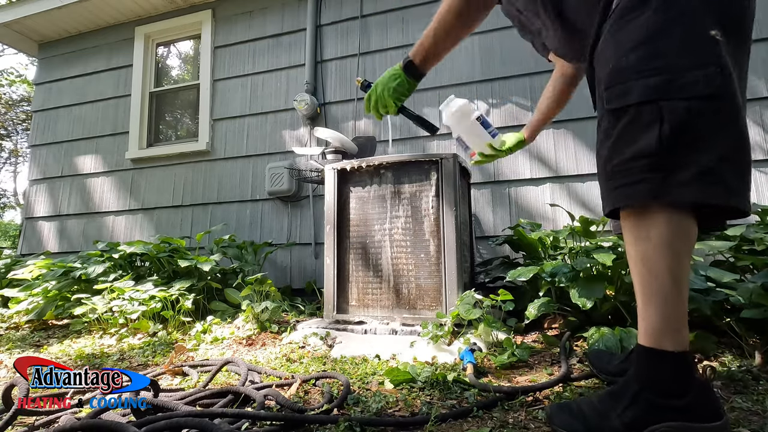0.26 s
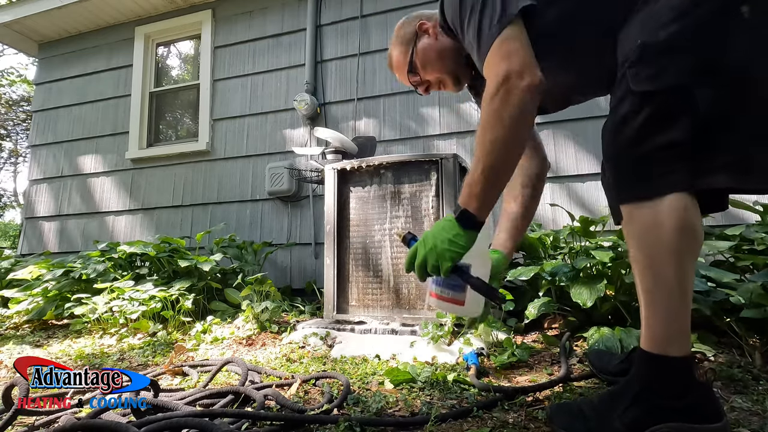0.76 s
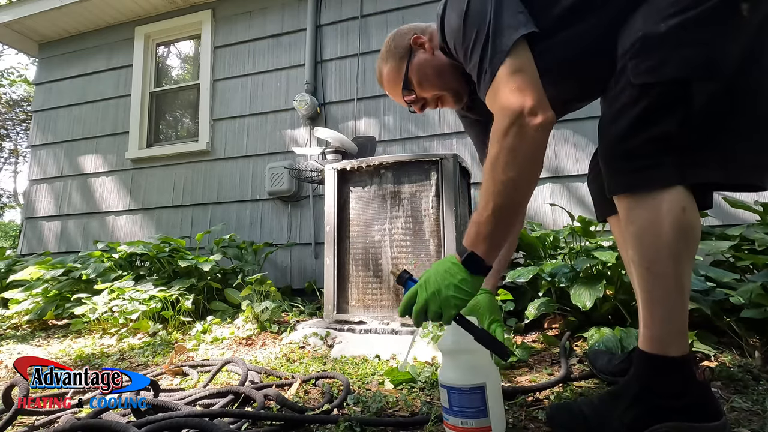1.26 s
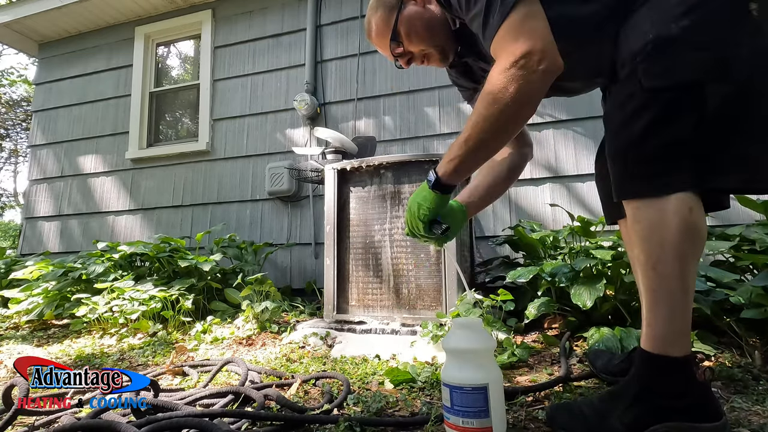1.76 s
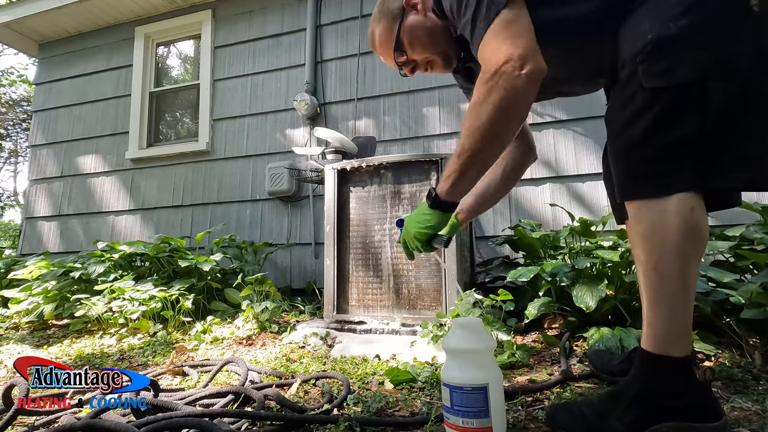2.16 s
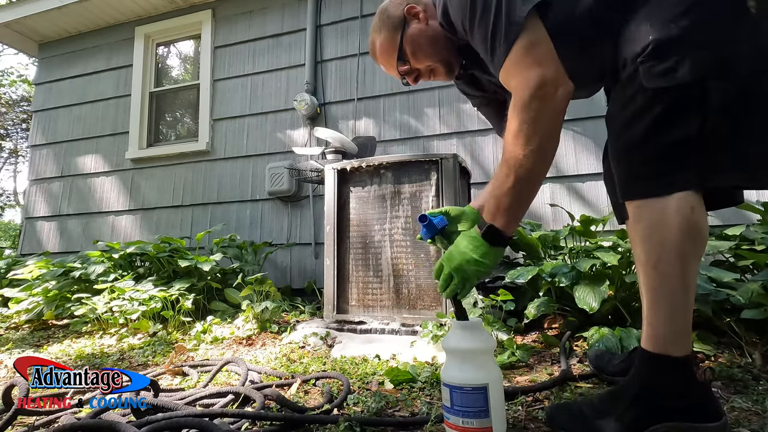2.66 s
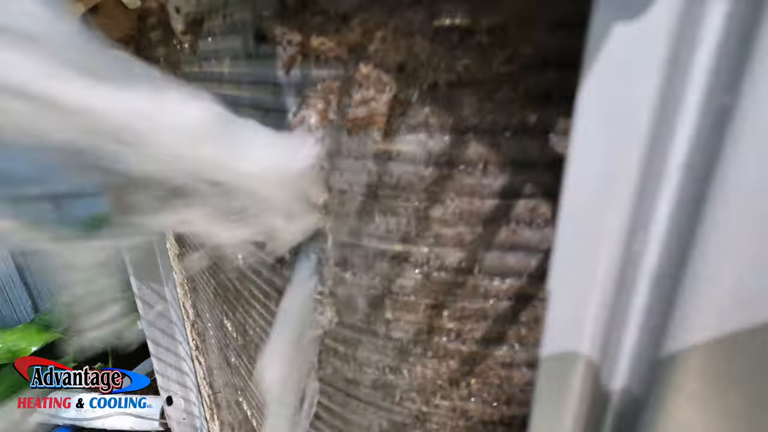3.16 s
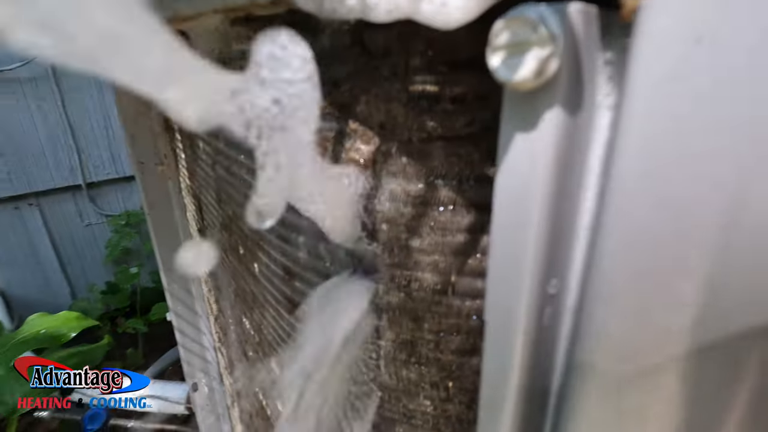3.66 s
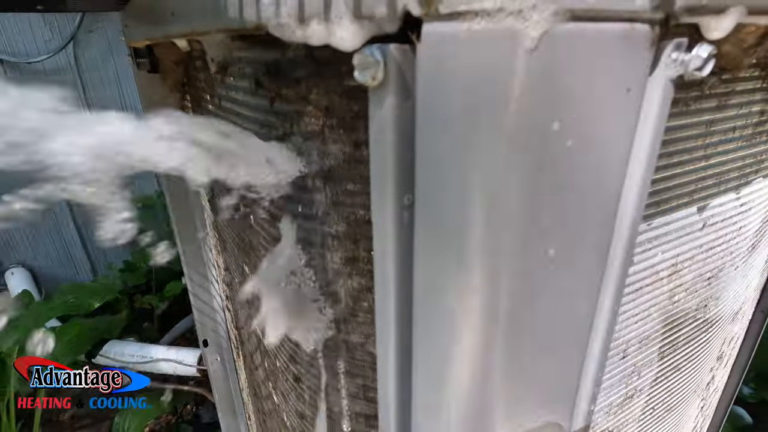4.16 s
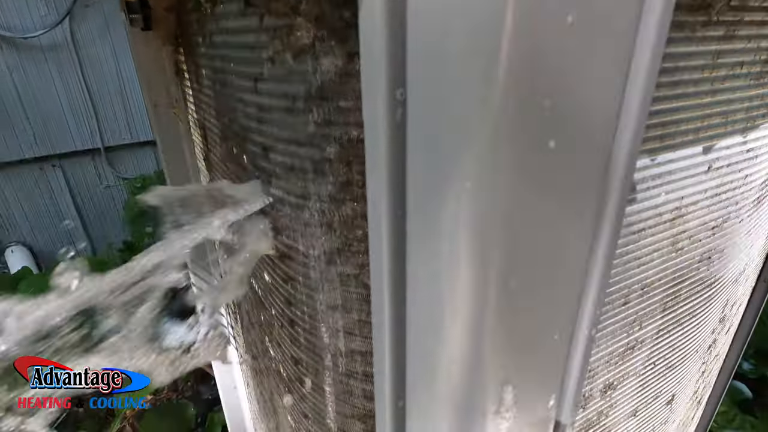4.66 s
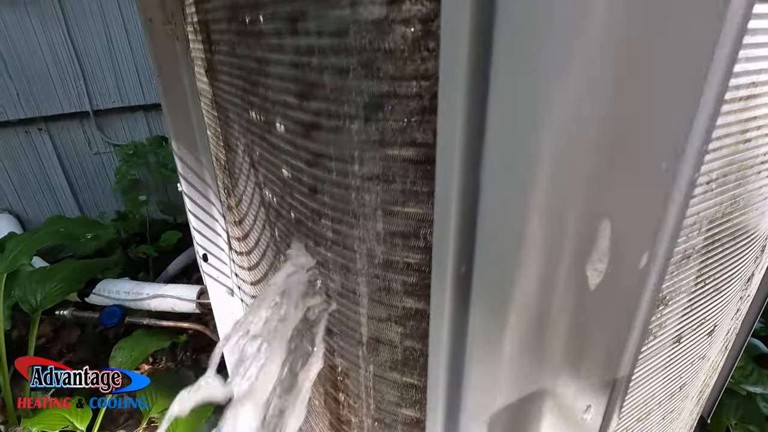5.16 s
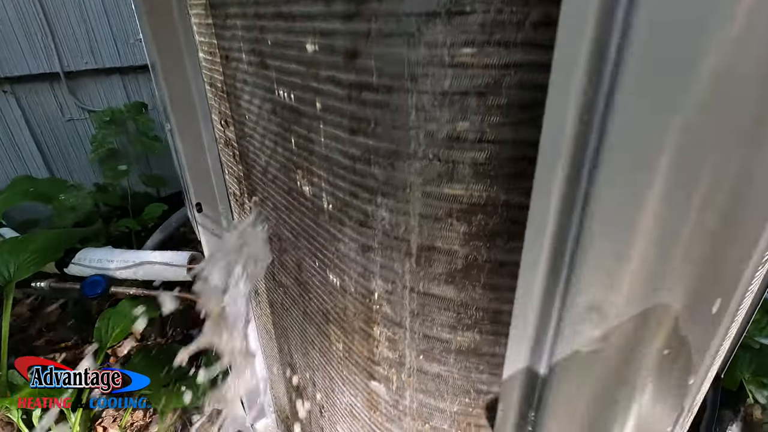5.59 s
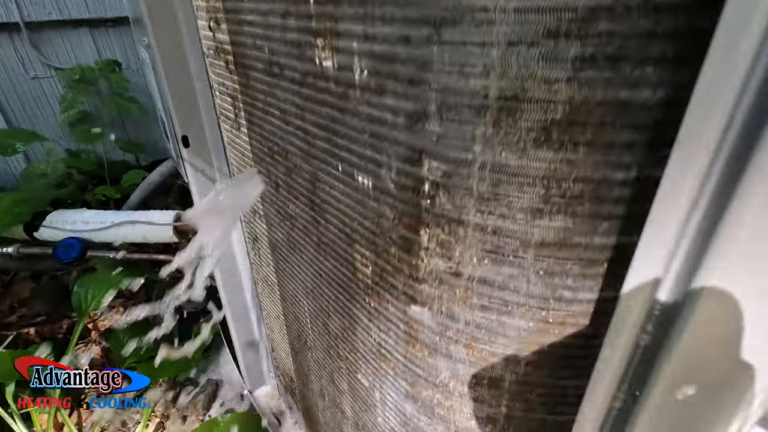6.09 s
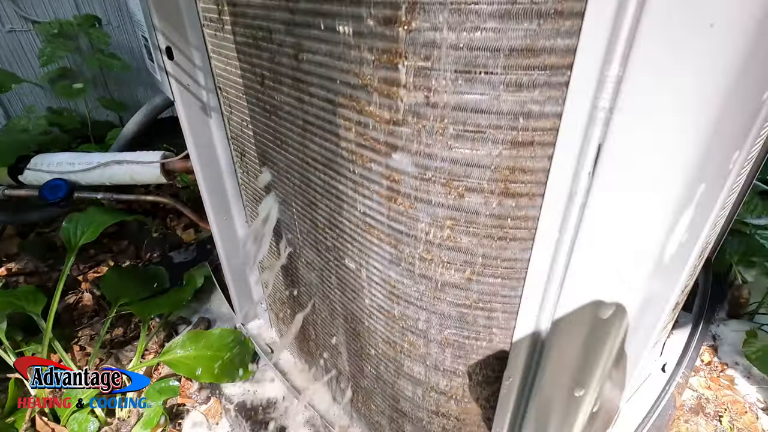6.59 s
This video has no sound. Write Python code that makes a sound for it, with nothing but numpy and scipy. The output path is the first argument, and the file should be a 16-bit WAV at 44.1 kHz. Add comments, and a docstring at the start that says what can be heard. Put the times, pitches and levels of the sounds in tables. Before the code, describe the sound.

In a quiet yard beside a house, wind rumbles and pops on a small stereo camera microphone over a low wavering hum. A plastic bottle is set down with a hollow knock amid small clicks and glove rustles; a hose nozzle then snaps sharply. The sound abruptly cuts to a close water jet on metal fins, bright and ringing, fizzing with spray, foamy gurgles and chirping bubbles until the end.

```python
"""Wind rumbles and pops throughout, over a mains hum (narrow wavering lines) and the hush of a yard.
From 0.66 s a plastic bottle is set down and a hose nozzle clicked together: struck modes, clicks, rustles.
From 2.83 s, close up, a water jet hits a coil's metal fins: droplet noise rings them in one bright band,
spray fizzes above, foam gurgles below and bubbles chirp. Two microphone ports of a small camera listen."""
import sys
import numpy as np
from scipy import signal
from scipy.fft import rfft, irfft
from scipy.io import wavfile
from scipy.ndimage import uniform_filter1d

SR = 44100
rng = np.random.default_rng(int(sys.argv[2]) if len(sys.argv) > 2 else 0)


def persist_wave(psi):
    """Save psi, clipped to +-1, as 16-bit WAV."""
    counts = np.round(np.clip(psi, -1, 1) * 32767).astype(np.int16)
    wavfile.write(sys.argv[1], SR, np.atleast_2d(counts).T)


N = 301379
T = np.arange(N) / SR  # s


def amp(db):
    """Amplitude factor of a level in dB."""
    return 10 ** (np.asarray(db) / 20)


def evened(x):
    """Scales to rms 1."""
    return x / np.sqrt(np.mean(x ** 2) + 1e-20)


def read(points, hz):
    """Reads a (Hz, value) curve along log frequency."""
    f, value = np.transpose(points)
    return np.interp(np.log(hz + 1), np.log(f + 1), value)


def curves(rows):
    """Joins the rows of a table into one time curve per column after the first (s)."""
    s, *columns = np.transpose(rows)
    return [np.interp(T, s, column) for column in columns]


def add(mix, s, sound):
    """Adds a sound in place at s seconds, cut at the end of the mix."""
    part = mix[..., round(s * SR):][..., :sound.shape[-1]]
    part += sound[..., :part.shape[-1]]


def panned(x, left_right_db):
    """Splits a level difference evenly between left and right."""
    return x * amp(np.array([[.5], [-.5]]) * left_right_db)


def filtered(x, order, hz, kind):
    """Butterworth filter."""
    return signal.sosfilt(signal.butter(order, hz, kind, fs=SR, output="sos"), x)


def smoothed(x, span):
    """Moving average over span samples, applied twice."""
    return uniform_filter1d(uniform_filter1d(x, span), span)


def drift(seconds):
    """Slow random curve of rms 1."""
    return evened(smoothed(rng.standard_normal(N), max(round(seconds * SR), 1)))


def resonate(x, hz, width_hz):
    """Shifts the curve hz down to zero, smooths, and shifts back: a resonance of gain 1."""
    turn = np.exp(2j * np.pi * np.cumsum(hz * np.ones(N)) / SR)
    r = np.exp(-np.pi * width_hz / SR)
    low = signal.lfilter([1 - r], [1, -r], x / turn + 1e-18)
    return 2 * (turn * low).real


def noise(spectrum, same, size, patchy_db=0., lead=((1, 0), (2, 0))):
    """Two channels of random short-time spectra with drifting patches of louder and softer."""
    hop, hz = size // 4, np.fft.rfftfreq(size, 1 / SR)
    a, b, c, d, patches = rng.standard_normal((N // hop + 5, len(hz), 5)).T
    patches = uniform_filter1d(uniform_filter1d(patches, size=8, axis=0), size=20, axis=1)
    level_db = read(spectrum, hz)[:, None] + patchy_db * evened(patches)
    alike = np.clip(read(same, hz), -1, 1)[:, None]
    left = a + 1j * b
    delayed = left * np.exp(-1j * read(lead, hz))[:, None]
    right = alike * delayed + np.sqrt(1 - alike ** 2) * (c + 1j * d)
    z = np.array([left, right]) * amp(level_db)
    return evened(signal.istft(z, nperseg=size, noverlap=size - hop)[1][:, :N])


# Yard spectrum. Each row: frequency in Hz, level in dB per Hz.
YARD_SPECTRUM = [(300, -2.5), (520, -2.5), (760, -9), (1120, -2.5), (2000, -7.5), (4500, -13),
                 (7600, -18.5), (8400, -25), (10900, -26), (12500, -28), (13500, -60), (15000, -75)]
# Left-right likeness of the yard. Each row: frequency in Hz, likeness 0 to 1.
YARD_SAME = [(60, 0.81), (240, 0.87), (940, 0.87), (3730, 0.69), (14800, 0.5)]
YARD_DB = -54.5


def yard():
    """Hush of the yard: steady, slightly patchy noise."""
    return amp(YARD_DB) * noise([(200, -15)] + YARD_SPECTRUM, YARD_SAME, 1024, patchy_db=.7)


# Hum lines. Each row: frequency in Hz, level in dB, width of the waver in Hz.
HUM_LINES = [(119.6, -37.5, 17.4), (185.5, -60, 1.6), (243, -55.5, 8), (306.4, -75, 1.2), (372, -65.5, 3.4)]


def hum():
    """Mains-driven machine: each line is a sine plus narrow-band noise around it."""
    out = np.zeros(N)
    for hz, db, width_hz in HUM_LINES:
        waver = resonate(resonate(rng.standard_normal(N), hz, width_hz), hz, width_hz)
        out += amp(db) * evened(np.sin(2 * np.pi * hz * T) + 0.39 * evened(waver))
    return out


# Wind on the microphones, swelling and easing. Each row: time in seconds, rumble in dB before gusts.
WIND_RUMBLE = [(0.0, -27), (0.6, -31.5), (0.87, -38), (1.1, -28), (1.8, -35.5), (2.05, -26.5), (2.3, -33),
               (2.57, -31), (2.8, -31), (3.3, -37), (3.85, -32), (4.3, -31.5), (4.95, -33), (5.3, -29),
               (5.7, -33.5), (6.1, -31), (6.5, -32), (6.82, -30.5)]
# Spectra of rumble and rough upper edge. Each row: frequency in Hz, level in dB per Hz.
RUMBLE_SPECTRUM = [(15, 10), (35, 14.5), (60, 14), (100, 5), (140, -3.5), (200, -72)]
EDGE_SPECTRUM = [(100, -9.5), (150, 7.5), (220, -1), (320, -11.5), (500, -31.5), (800, -74)]
# Gusts, most of them stronger at one port. Each row: middle in seconds, half width in seconds,
# rise of the rough edge in dB, left-right difference in dB.
GUSTS = [(0.0, 0.081, 5.5, -5), (.35, 0.079, 14, -4.5), (.75, 0.3, 6.5, 0), (2.42, 0.084, 8, -9),
         (4.68, 0.27, 6.5, 14.5), (6.8, 0.29, 6.5, 11.5)]
# Pressure pops of a gust. Each row: middle in seconds, level in dB, pitch in Hz, left-right in dB.
POPS = [(0.177, -24, 149, -11), (0.193, -16, 62.7, -4), (0.307, -20.5, 243, -13), (.352, -23, 269, -13),
        (0.363, -22.5, 218, -14), (0.694, -26, 163, -8), (1.672, -19, 25, -4), (2.403, -13.5, 54.6, -2),
        (2.422, -14, 54.5, -5), (2.46, -16, 101, -4), (2.774, -23, 138, -8), (4.558, -19, 110, 14),
        (4.615, -19.5, 90, 14), (4.746, -23, 149, 5), (4.813, -26, 146, 9)]
EDGE_DB, EDGE_FOLLOWS = -47.5, 0.093  # edge at rest, its share of the rumble's swings
GUST_LIFT, WIND_LEAN_DB = 0.42, -0.3  # rumble's share of a gust, constant left-right


def pop(hz):
    """One swing of pressure with a sharper peak in its middle."""
    u = np.arange(-1.5, 1.5, hz / SR)  # cycles
    peak = 0.22 * np.exp(-(u / 0.16) ** 2)
    return np.exp(-(u / 0.41) ** 2) * (np.cos(2 * np.pi * u + 0.5) + peak)


def wind():
    """Lumpy low pressure; gusts, most stronger at one port, raise a rougher upper edge; single pops."""
    rumble_db, = curves(WIND_RUMBLE)
    shapes = np.array([np.exp(-((T - s) / half_s) ** 2) for s, half_s, _, _ in GUSTS])
    gust_db, pan_db = np.transpose(GUSTS)[2:] @ shapes
    edge_db = EDGE_DB + EDGE_FOLLOWS * (rumble_db - rumble_db.mean()) + gust_db
    rumble = noise(RUMBLE_SPECTRUM, [(20, 0.6), (60, 0.8), (150, 0.85)], size=4096)
    edge = noise(EDGE_SPECTRUM, [(150, 1.0), (500, 0.82)], size=2048)
    out = amp(rumble_db + GUST_LIFT * gust_db + 1.07 * drift(0.045)) * rumble
    out = out + amp(edge_db + 0.96 * drift(0.0098)) * edge
    out = panned(out, WIND_LEAN_DB + pan_db)
    for s, db, hz, left_right_db in POPS:
        add(out, s - 1.505 / hz, panned(amp(db) * pop(hz), left_right_db))
    return out


# Leaves and gloves brushed. Each row: loudest moment in seconds, level in dB, rise in dB per s,
# fall in dB per s, lowest frequency in Hz.
RUSTLES = [(.93, -50, 3000, 232, 400), (1.2, -43.5, 114, 136, 900), (1.3, -51, 500, 300, 900),
           (1.355, -53, 800, 150, 500), (1.938, -50, 195, 250, 3500), (2.224, -35, 5000, 562, 400)]
# Brushed spectrum. Each row: frequency in Hz, level in dB per Hz.
BRUSHED_SPECTRUM = [(300, -2), (800, 3.5), (2000, 4), (4000, -2.5), (7000, -11.5), (9000, -20),
                    (14000, -28)]


def rustle():
    """Flickering brushed noise that swells and dies under each movement; a light touch has no body."""
    brushed = noise(BRUSHED_SPECTRUM, [(500, 1.0), (12000, 0.64)], size=256)
    brushed = brushed * amp(2.5 * drift(.003) + 2.5 * drift(.012))
    out = 0
    for s, db, rise, fall, low_hz in RUSTLES:
        drop_db = np.where(T < s, rise * (s - T), fall * (T - s))
        out = out + amp(db - drop_db) * evened(filtered(brushed, 2, low_hz, "high"))
    return out


# Dry clicks of plastic parts. Each row: start in seconds, level at the start in dB, centre in Hz.
CLICKS = [(0.661, -45, 2120), (0.888, -44, 3100), (0.93, -39, 2470), (1.195, -32, 2150), (1.218, -37, 3170),
          (1.2338, -32, 4180), (1.2979, -42, 3730), (1.3544, -52, 2560), (1.249, -44, 3900),
          (1.839, -44, 2300), (2.2213, -19.5, 4900), (2.2279, -20, 1970), (2.2405, -32, 1200),
          (2.372, -43.5, 3400), (2.4323, -48, 4000)]
CLICK_T60_S = 0.017


def clicks():
    """Short dying bursts of noise around a centre pitch, over a wide crack."""
    out, t = np.zeros(N), T[:2000]
    for (s, db, hz), burst in zip(CLICKS, rng.standard_normal((len(CLICKS), 3000))):
        wide = filtered(burst, 3, [1100, 7600], "band")
        near = filtered(burst, 2, [hz * 0.94, hz * 1.16], "band")
        crack = evened(evened(near) + evened(wide) + 0.18 * burst)[-len(t):]
        add(out, s, np.minimum(t / 0.00077, 1) * amp(db - 60 * t / CLICK_T60_S) * crack)
    return out


# Modes of bottle and nozzle. Each row: frequency in Hz, relative level in dB, t60 in seconds.
BOTTLE_MODES = [(217.7, -2.5, 0.39), (396, 9.5, 0.02), (628, -3.5, 0.077), (1086, -7, 0.09),
                (1160, -7.5, 0.04), (470, -11, 0.075), (1610, -7.5, 0.019), (2750, -14.5, 0.017),
                (4080, -21, 0.015)]
NOZZLE_MODES = [(1215, -2, 0.042), (2060, -4, 0.026), (2430, -8, 0.036), (3270, -12, 0.048),
                (4170, 0.5, 0.011)]
# Blows on bottle and nozzle. Each row: start in seconds, level in dB, hardness in dB per octave.
BOTTLE_KNOCKS = [(0.888, -30.5, -11), (1.108, -24.5, -3.5), (1.18, -22, -2), (1.235, -3, 2.5),
                 (1.3, -25, 4), (1.221, -21, -5), (1.36, -24, 3)]
NOZZLE_TAPS = [(0.887, -29, 0), (0.9317, -22, -9), (1.1931, -13, 0.5)]


def struck(modes, blows):
    """Every blow rings the same modes; a harder one favours the high; loose plastic roughens the ring."""
    out, t = np.zeros(N), T[:SR // 3]
    for (s, db, hard_db), rattle in zip(blows, rng.standard_normal((len(blows), len(t)))):
        ring = np.zeros(len(t))
        for hz, level_db, t60_s in modes:
            mode_db = level_db + hard_db * np.log2(hz / modes[0][0]) - 60 * t / t60_s
            ring += amp(mode_db) * np.sin(2 * np.pi * hz * t)
        ring = ring * amp(1.2 * evened(smoothed(rattle, 90)))
        onset = 1 - np.exp(-t / 0.0027)
        add(out, s, -amp(db) * ring * onset / abs(ring).max())
    return out


def wall(x):
    """The house wall and the ground send back a short sparse tail, different at each port."""
    taps = rng.choice([-1., 1.], (2, 5000)) * (rng.random((2, 5000)) < .05)
    taps = taps * amp(-60 * T[:5000] / 0.15)
    taps[:, :130] = 0  # 3 ms before the first echo
    return signal.oaconvolve(x[None], taps / np.linalg.norm(taps[0]), axes=1)[:, :N]


def bubble(hz, cycles, rise):
    """A shrinking air pocket: a few cycles that slide up in pitch."""
    length = cycles / hz * SR  # samples
    u = np.arange(round(length)) / length
    return np.sin(np.pi * u ** 0.99) ** 2 * np.sin(2 * np.pi * cycles * (u + rise * u ** 2 / 2))


def foam(per_s, low_hz, high_hz, cycles, spread_db):
    """Small bubbles at random, levels spread exponentially in dB, each pitch a little left or right."""
    size = amp(spread_db * np.minimum(rng.exponential(1, N), 5)) * (rng.random(N) < per_s / SR)
    kind, out = rng.integers(0, 16, N), np.zeros((2, N))
    for k, hz in enumerate(np.geomspace(low_hz, high_hz, 16)):
        voice = signal.oaconvolve(size * (kind == k), bubble(hz, cycles, rise=0.57))[:N]
        out += panned(voice, rng.normal(0, 1))
    return evened(out)


# Air pockets in the foam, sounding as the jet crosses them. Each row: middle in seconds, level in dB,
# pitch in Hz, length scale in seconds.
BLURTS = [(2.934, -32, 1720, 0.18), (2.958, -30, 2070, .025), (3.053, -33, 1010, 0.069),
          (3.269, -38.5, 975, 0.24), (3.56, -33.5, 935, 0.076), (4.792, -34.5, 1840, 0.079),
          (4.897, -36, 2140, 0.035), (4.996, -29.5, 2060, 0.038), (5.046, -33, 2030, 0.069),
          (5.135, -34, 1940, 0.062), (5.433, -31, 1670, 0.04),          (5.273, -30, 2040, 0.042),
          (5.328, -38, 1800, 0.053),           (6.45, -33.5, 1970, 0.037)]


def blurts():
    """Each pocket filters a spattering puff of noise to its own pitch."""
    out = np.zeros(N)
    for (s, db, hz, length_s), puff in zip(BLURTS, rng.standard_normal((len(BLURTS), SR // 4))):
        n = min(round(1.4 * length_s * SR), len(puff))
        tone = evened(filtered(puff, 2, [hz * 0.93, hz * 1.075], "band"))
        add(out, s - n / SR / 2, amp(db) * tone[:n] * signal.windows.hann(n))
    return out * amp(3 * drift(.006) - 1.5)


def fin_ring(fins, drops):
    """Water on the fins shifts their ring as the jet wanders; small bubbles sound with it."""
    out = 0
    for hz, width_hz, db in fins:
        wet_hz = hz * (1 + 0.012 * drift(0.015) + 0.009 * drift(.12))
        flicker_db = 1.3 * drift(0.005) + 0.4 * drift(0.04)
        mode = resonate(resonate(drops, wet_hz, width_hz), wet_hz, width_hz) / np.sqrt(width_hz)
        out = out + amp(db + flicker_db) * mode
    last_hz = fins[-1][0]
    bubbles = foam(1500, 0.82 * last_hz, 1.12 * last_hz, cycles=10, spread_db=3.)
    return evened(evened(out) + 0.3 * bubbles)


# The jet wanders over the coil. Each row: time in seconds, low ring of the fins in dB,
# high ring in dB, fizz in dB, all before the surge.
JET_LEVELS = [(2.84, -29.5, -26.5, -30), (2.92, -25, -28, -35), (3.02, -27.5, -25.5, -32),
              (3.2, -28.5, -28, -29), (3.4, -31.5, -28, -29), (3.6, -31, -28, -27),
              (3.82, -28, -30.5, -27.5), (3.95, -27, -32, -33), (4.15, -26.5, -35.5, -32),
              (4.3, -29.5, -34.5, -31.5), (4.45, -29.5, -29.5, -31), (4.6, -30, -29.5, -31.5),
              (4.72, -27.5, -31.5, -34), (4.82, -33.5, -35.5, -33), (4.9, -31.5, -37, -36),
              (4.95, -35, -31, -34), (5.03, -28, -37, -32.5), (5.14, -34.5, -39, -33.5),
              (5.21, -31.5, -32, -36), (5.29, -30.5, -37.5, -33), (5.39, -28, -29.5, -35.5),
              (5.46, -33, -33, -32.5), (5.52, -26.5, -38, -34), (5.62, -33.5, -31, -36.5),
              (5.73, -28, -29.5, -32), (6.08, -26.5, -32, -30), (6.4, -30, -27, -30.5),
              (6.65, -30.5, -31, -29), (6.8, -29.5, -30.5, -33.5)]
# Fin resonances. Each row: frequency in Hz, width in Hz, relative level in dB.
LOW_FINS = [(2880, 150, -1), (2690, 200, -1), (3020, 420, 2)]
HIGH_FINS = [(3380, 300, -3), (3780, 330, -2), (3300, 650, 4)]
# Spectra of spray, splash and foam. Each row: frequency in Hz, level in dB per Hz.
FIZZ_SPECTRUM = [(2530, -6), (4300, -4.5), (6710, -4), (7610, -7), (8240, -13), (9920, -9), (12000, -16),
                 (13800, -22.5), (14700, -107), (15200, -57)]
SPLASH_SPECTRUM = [(900, -46), (1350, 2.5), (1800, 4), (2300, 6), (3000, 1), (4000, -62)]
GURGLE_SPECTRUM = [(180, -12.5), (350, -5), (700, -4.5), (1000, 0), (1300, -2), (1700, -59)]
# Left-right likeness of the jet. Each row: frequency in Hz, likeness 0 to 1.
JET_SAME = [(300, 0.91), (1400, 0.96), (3060, 0.85), (6730, 1), (14800, 0.46)]
# Phase of the jet. Each row: frequency in Hz, lead of the left in radians.
JET_LEAD = [(1500, -0.56), (3200, -0.88), (4700, 0.072), (7000, -0.31), (7800, -1.4), (9300, -1.04)]
# Stereo tilt of the jet. Each row: frequency in Hz, left-right difference in dB.
JET_TILT = [(500, -0.2), (4900, -0.9), (14800, 3.5)]
# Large bubbles, quick rising chirps. Each row: start in seconds, level in dB, starting pitch in Hz.
BUBBLES = [(3.984, -23, 5000), (4.058, -23, 5940), (4.134, -20, 3920), (4.7352, -14, 3730),
           (4.7771, -20, 4430), (5.0365, -22, 3800), (5.054, -22, 4300), (5.092, -24, 3900),
           (5.251, -18, 3700), (5.447, -24, 5200), (6.4567, -24, 3970)]
JET_ON_S = 2.8265
SPLASH_DB, GURGLE_DB = -37, -43  # once the first thick foam has thinned
FOAM_SPLASH_DB, FOAM_GURGLE_DB = 5.5, 6  # extra level while the foam is thick
# the splash eases from the start; the gurgle holds, then drops
FOAM_THINS_S, FOAM_GONE_S, FOAM_FADE_S = 0.64, 4.08, 0.11


def jet():
    """Droplet noise rings the fins; fizz, splash and gurgle follow the same surging flow."""
    low_db, high_db, fizz_db = curves(JET_LEVELS)
    thick = np.exp(-abs(T - JET_ON_S) / FOAM_THINS_S)
    splash_db = SPLASH_DB + FOAM_SPLASH_DB * thick + 1.2 * drift(.15)
    held = 1 / (1 + np.exp((T - FOAM_GONE_S) / FOAM_FADE_S))
    gurgle_db = GURGLE_DB + FOAM_GURGLE_DB * held + 1.2 * drift(.1)
    surge = drift(0.023)

    drops = noise([(500, 0), (8000, 0)], JET_SAME, 512, patchy_db=-0.4, lead=JET_LEAD)
    drops = drops * amp(2.6 * drift(0.0006))
    fins = amp(low_db) * fin_ring(LOW_FINS, drops) + amp(high_db) * fin_ring(HIGH_FINS, drops)

    # the leading point holds -17 dB below 3000 Hz; the table applies above
    fizz = noise([(3000, -17)] + FIZZ_SPECTRUM, JET_SAME, 256, patchy_db=1.7, lead=JET_LEAD)
    fizz = fizz * amp(0.72 * drift(0.0056))
    fizz = evened(fizz + 0.4 * foam(740, 3590, 7820, cycles=8.1, spread_db=-1.5))

    splash = noise(SPLASH_SPECTRUM, JET_SAME, 512, patchy_db=-1.0)
    splash = evened(splash + 0.42 * foam(250, 1338, 2296, cycles=13.2, spread_db=0.0))
    gurgle = noise(GURGLE_SPECTRUM, JET_SAME, 512, patchy_db=1.5)
    gurgle = evened(gurgle + 0.2 * foam(150, 590, 1426, cycles=8.5, spread_db=5.0))

    out = amp(.6 * surge) * fins + amp(fizz_db + .8 * surge) * fizz
    out = out + amp(splash_db + .8 * surge) * splash + amp(gurgle_db + .6 * surge) * gurgle
    out = out + blurts()
    for s, db, hz in BUBBLES:
        add(out, s, amp(db) * bubble(hz, cycles=9.0, rise=0.76))
    tilt = panned(1, read(JET_TILT, np.fft.rfftfreq(N, 1 / SR)))
    return irfft(rfft(out) * tilt, N) * np.clip((T - JET_ON_S) / 0.0001, 0, 1)


def scene():
    """Hands and bottle first, then the jet, over wind, hum and the hush of the yard."""
    hands = struck(BOTTLE_MODES, BOTTLE_KNOCKS) + struck(NOZZLE_MODES, NOZZLE_TAPS) + clicks()
    background = yard() + panned(hum(), -0.28) + wind()
    return background + rustle() + panned(hands, -1.6) + amp(-13.5) * wall(hands) + jet()


EDGE_HZ = 15380


def record(dry):
    """The band limit of the camera: a steep low-pass."""
    lowpass = signal.firwin(511, EDGE_HZ, window=("kaiser", 9), fs=SR)
    return signal.oaconvolve(dry, lowpass[None], "same")


dry = scene()
out = record(dry)
persist_wave(out)
```